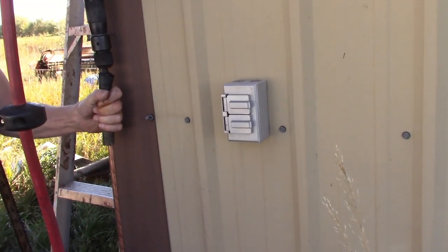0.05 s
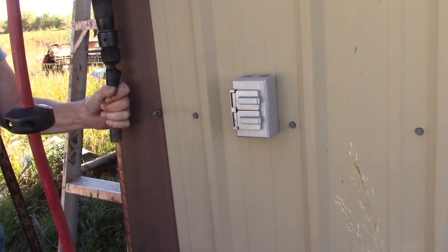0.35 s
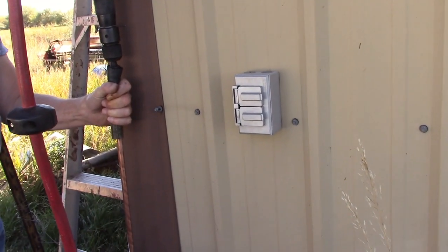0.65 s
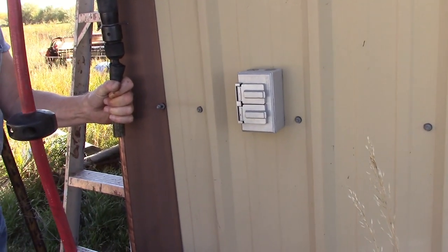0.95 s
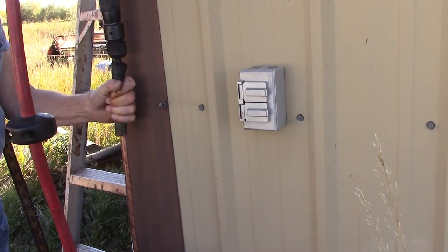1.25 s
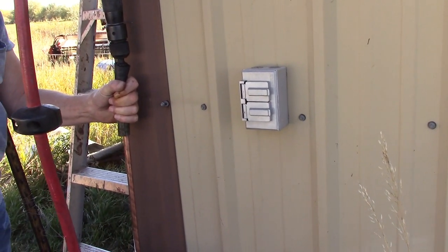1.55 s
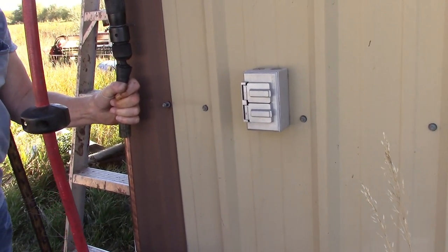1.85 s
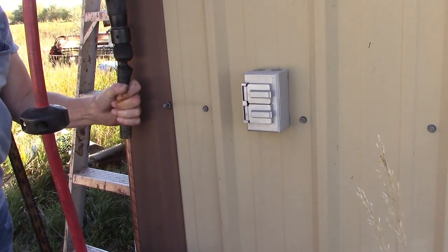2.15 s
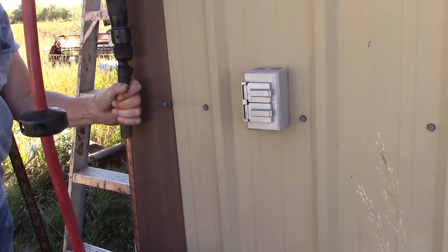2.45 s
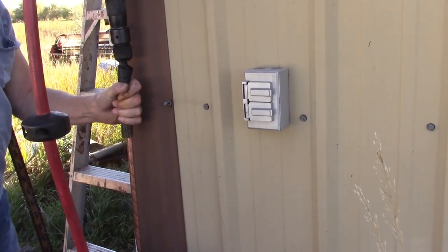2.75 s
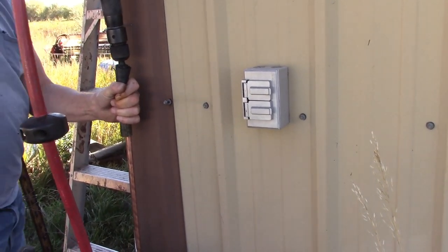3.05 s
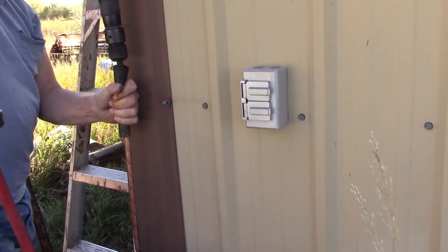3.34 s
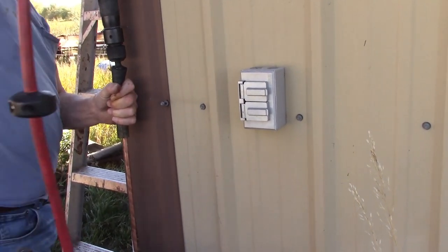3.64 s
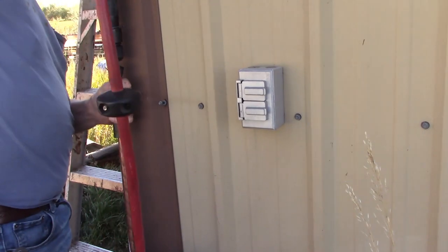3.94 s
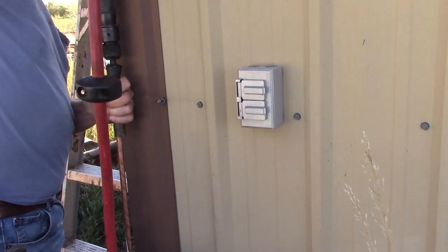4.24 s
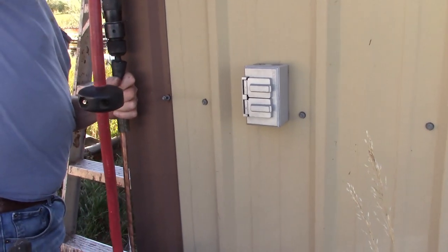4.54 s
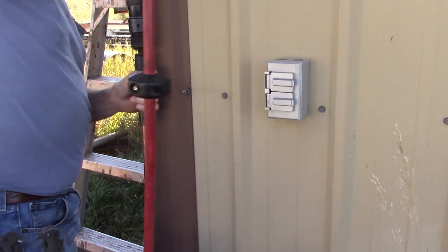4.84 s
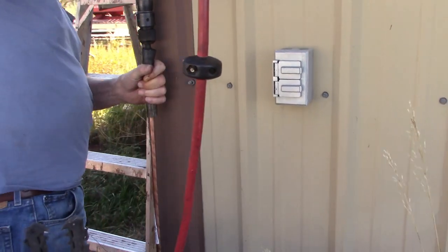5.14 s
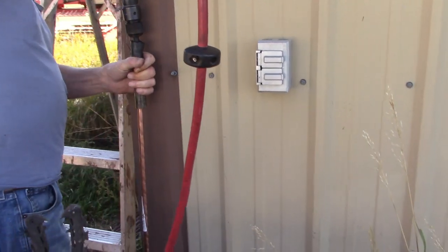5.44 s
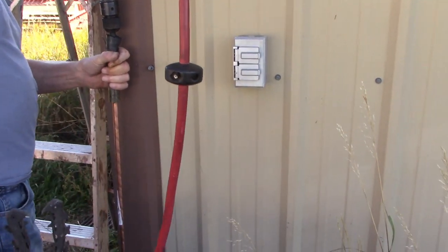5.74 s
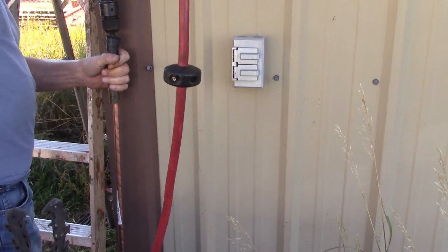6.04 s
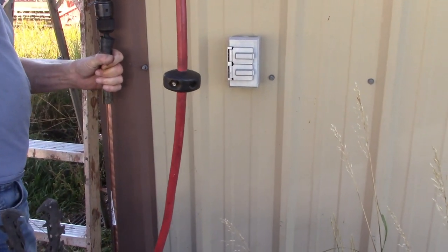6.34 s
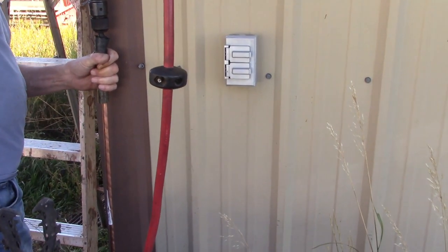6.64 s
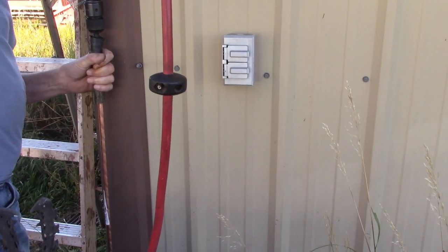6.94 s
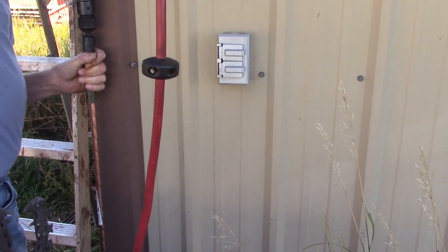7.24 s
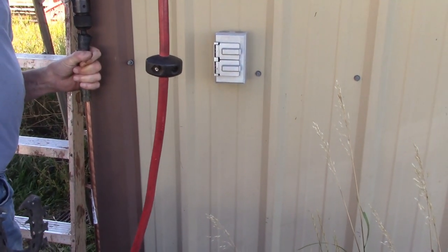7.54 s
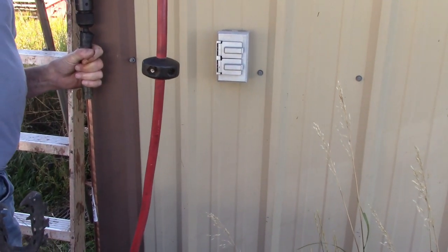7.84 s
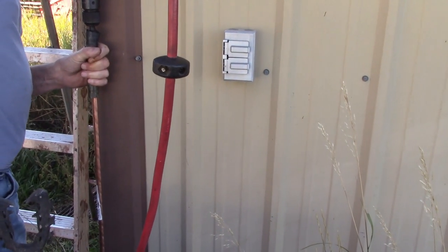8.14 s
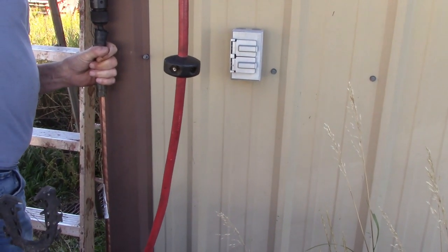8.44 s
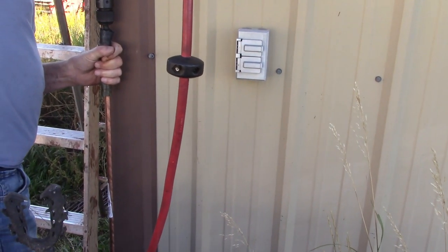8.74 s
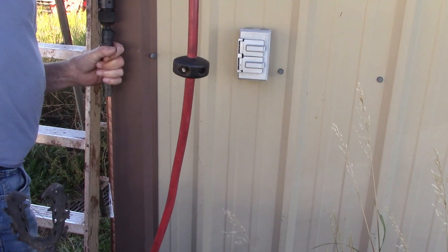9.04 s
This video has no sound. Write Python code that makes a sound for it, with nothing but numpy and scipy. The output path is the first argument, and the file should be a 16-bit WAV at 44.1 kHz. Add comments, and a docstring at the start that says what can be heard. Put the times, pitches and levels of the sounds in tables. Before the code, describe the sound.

A hand-held air hammer drives a steel rod into the ground beside a sheet-metal shed. Its loud, fast chatter mixes sharp metallic blows, spitting exhaust air and the ringing of the rod. After about three seconds it stops briefly, with a few clacks and a short hiss of air, then stutters back into steady hammering. The sound is close, with light outdoor reflections.

```python
"""A rapid metallic hammering, about 32 strokes a second, fills a quiet yard: a hand-held air hammer
drives a steel ground rod beside a sheet-metal shed. Each stroke is an exhaust puff that drums the shed
wall, then a piston impact that excites the normal modes of bit and rod; wall and ground reflect it.
After three seconds the tool rests briefly and clacks, air hisses through the half-pressed trigger,
and the piston stutters back to life."""
import sys
import numpy as np
from scipy import signal
from scipy.fft import rfft, irfft, next_fast_len
from scipy.io import wavfile
from scipy.ndimage import uniform_filter1d

SR = 44100
rng = np.random.default_rng(int(sys.argv[2]) if len(sys.argv) > 2 else 0)


def generate_wav(sig):
    """Save sig (samples, or channels by samples) to the path in sys.argv[1] as 16-bit PCM at SR."""
    pcm = np.round(np.clip(np.atleast_2d(sig).T, -1, 1) * 32767).astype(np.int16)
    wavfile.write(sys.argv[1], SR, pcm)


N = 405279


def amp(db):
    """Amplitude ratio of a level in decibels."""
    return 10 ** (np.asarray(db) / 20)


def unit(x):
    """Normalisation to rms 1."""
    return x / np.sqrt(np.mean(x ** 2) + 1e-20)


def along(points, hz):
    """Interpolation of (frequency, value) points on a logarithmic axis."""
    f, values = np.transpose(points)
    return np.interp(np.log(hz + 1), np.log(f + 1), values)


def curve(points, times):
    """Linear interpolation of (time, value) points."""
    return np.interp(times, *np.transpose(points))


def filtered(x, response):
    """Linear filtering: the spectrum of x times a frequency response."""
    size = next_fast_len(N + SR // 2)
    return irfft(rfft(x, size) * response(np.fft.rfftfreq(size, 1 / SR)), size)[:N]


def tinted(x, spectrum):
    """Spectral shaping that conserves the power of a white input."""
    return filtered(x, lambda hz: unit(amp(along(spectrum, hz))))


def noise(spectrum):
    """Coloured Gaussian noise of rms about 1."""
    return tinted(rng.standard_normal(N), spectrum)


def impulse(spectrum, size=4096):
    """The minimum-phase pulse of a spectrum, from its folded cepstrum."""
    cepstrum = irfft(along(spectrum, np.fft.rfftfreq(size, 1 / SR)) * np.log(10) / 20)
    cepstrum[1:size // 2] *= 2
    cepstrum[size // 2 + 1:] = 0
    return irfft(np.exp(rfft(cepstrum)))[:size // 2]


def decay(attack, t60, size=3000):
    """Exponential damping after a quick rise; both times are in seconds."""
    t = np.arange(size) / SR
    return (1 - np.exp(-t / attack)) * amp(-60 * t / t60)


def scatter(times, spread):
    """One Gaussian deviation per stroke."""
    return spread * rng.standard_normal(len(times))


def train(times, db, shapes):
    """Superposition of one shape per stroke, scaled so that a steady run has the rms level db."""
    shapes = np.broadcast_to(shapes, (len(times), shapes.shape[-1]))
    energy = np.mean(np.sum(shapes ** 2, axis=1))
    scale = np.sqrt(np.median(np.diff(times)) * SR / energy)
    index = np.round(np.abs(times) * SR).astype(int)[:, None] + np.arange(shapes.shape[1])
    return np.bincount(index.ravel(), (scale * amp(db)[:, None] * shapes).ravel(), N)[:N]


def ringing(times, db, modes, loose, detune, vary_db=2.5, ratio=1, attack=0.0004):
    """Damped normal modes, struck at varying strength; loose contact scatters phase [rad] and pitch."""
    shapes = 0
    for hz, mode_db, t60 in modes:
        envelope = decay(attack, t60)
        t = np.arange(len(envelope)) / SR
        strength, phase, pitch = rng.standard_normal((len(times), 3)).T[:, :, None]
        tone = np.sin(2 * np.pi * hz * (ratio + detune * pitch) * t + loose * phase)
        shapes = shapes + amp(mode_db + vary_db * strength) * envelope * tone
    return train(times, db, shapes)


# Outdoor background: (frequency [Hz], relative spectral level [dB])
BACKGROUND_SPECTRUM = [(25, -40), (60, -27), (120, -12.5), (280, -11.5), (600, -21), (1500, -22.5),
                       (3800, -35), (7000, -36), (16000, -49)]
def background():
    """Stationary low noise, masked while the hammer runs."""
    return amp(-42.5) * noise(BACKGROUND_SPECTRUM)


RUN_STARTS_S = (.0079, 3.6894)
# Piston rate in the first and the second run: (time [s], rate [strokes/s])
FIRST_RATE = [(0.01, 32.83), (0.62, 33.13), (1.27, 32.7), (2.63, 33.13), (2.7, 32.3), (3.04, 31.6)]
SECOND_RATE = [(3.69, 34.45), (4.15, 30.96), (4.59, 31.29), (5.5, 29.14), (5.68, 29.94), (5.73, 32.68),
               (7.72, 32.61), (9.19, 32.97)]
def strokes(jitter_s=.00003, drift_s=.0003):
    """Phase is the integral of rate: the piston fires once a cycle, with slightly wandering timing."""
    times = []
    for start, rate in zip(RUN_STARTS_S, (FIRST_RATE, SECOND_RATE)):
        t = np.arange(start * SR, rate[-1][0] * SR) / SR
        cycles = np.cumsum(curve(rate, t)) / SR
        times.extend(np.interp(np.arange(cycles[-1]), cycles, t))
    return np.array(times) + scatter(times, jitter_s) + uniform_filter1d(scatter(times, drift_s), size=9)


def load(times, free_hz=32.8, loaded_hz=29.2):
    """Mechanical loading slows the piston, so its rate gives the weight on the tool, 0 to 1."""
    rate = curve(FIRST_RATE + SECOND_RATE, times)
    return np.clip((free_hz - rate) / (free_hz - loaded_hz), 0, 1)


# The puff, coloured by the tool and its corner: (frequency [Hz], relative spectral level [dB])
PUFF_SPECTRUM = [(60, -35.5), (120, -21.5), (155, -3.5), (195, -4), (235, -16), (275, -2.5), (355, -0.5),
                 (395, -15.5), (440, -2.5), (560, -0.5), (650, 2.5), (730, -5), (900, -18.5), (4000, -37.5)]
def exhaust_puff(times, db):
    """Sudden outflow: the opening port radiates a low pressure pulse of the same shape each time."""
    return train(times + 0.00072, db + 0.26 + scatter(times, 0.46), impulse(PUFF_SPECTRUM))


# Air jet at the exhaust port: (frequency [Hz], relative spectral level [dB])
JET_SPECTRUM = [(100, -32), (600, 8), (1000, -0.5), (2000, 1), (5000, 6), (9000, 4), (12500, 4),
                (14000, -1), (16000, -18)]
def exhaust_jet(times, db):
    """Turbulence: each release of air makes a short spit of broadband noise."""
    envelope = train(times + 0.00033, db + scatter(times, 0.97), decay(attack=0.00048, t60=0.015))
    return envelope * noise(JET_SPECTRUM)


# Modes of the sheet-metal wall: (frequency [Hz], relative level [dB], T60 [s])
PANEL_MODES = [(164.2, 5.5, 0.11), (264.1, 14, 0.09)]
def shed_panel(times, puff_db, coupling_db=-16, load_db=4.5):
    """Forced plate vibration: the puffs drum the wall, more loudly as the rod bears on it."""
    db = puff_db + coupling_db + load_db * load(times)
    return ringing(times, db, PANEL_MODES, loose=0.03, detune=0.001, vary_db=0.5, attack=0.0064)


# Snap of the piston on the bit: (frequency [Hz], relative spectral level [dB])
SNAP_SPECTRUM = [(3000, -45), (6500, 1), (8000, 1.5), (11000, 3), (12800, -4.5), (14000, -15), (16000, -18)]
def impact_snap(times, db):
    """Brief steel-on-steel contact gives a transient rich in high frequencies."""
    envelope = train(times, db + scatter(times, 1.04), decay(attack=0.000063, t60=0.028))
    return envelope * noise(SNAP_SPECTRUM)


# Clatter of the blow: (frequency [Hz], relative spectral level [dB])
CLATTER_SPECTRUM = [(30, -45), (100, -7), (250, -6.5), (600, 5.5), (1000, -2.5), (1600, 0), (2500, 0.5),
                    (3300, 1.5), (4400, -1.5), (6500, -1.5), (9000, -8.5), (16000, -33)]
def clatter(times, db, coherence=0.86, corner_hz=2600, rattle_s=0.0106, rattle_db=-12):
    """Modal overlap: dense steel modes merge into noise; only the low ones ring alike at each blow."""
    db = db + 1.23 + scatter(times, 1.0)
    envelope = decay(attack=0.00032, t60=0.041)
    rattle = np.pad(decay(attack=0.0003, t60=0.012), (round(rattle_s * SR), 0))  # the bit strikes again
    envelope += amp(rattle_db) * rattle[:len(envelope)]
    fresh, drifting = rng.standard_normal((2, len(times), len(envelope)))
    drifting = uniform_filter1d(drifting, size=25, axis=0)  # shared by neighbouring blows
    share = lambda hz: coherence / (1 + (hz / corner_hz) ** 2)
    steady = filtered(train(times, db, drifting * envelope), lambda hz: np.sqrt(share(hz)))
    changing = filtered(train(times, db, fresh * envelope), lambda hz: np.sqrt(1 - share(hz)))
    return tinted(steady + changing, CLATTER_SPECTRUM)


# Bending modes of the loaded rod: (nominal frequency [Hz], relative level [dB], T60 [s])
BENDING_MODES = [(193, -2, 0.062), (338.6, -1, 0.12), (848, -9.5, 0.18), (1158, -3, 0.13),
                 (1420, -0.5, 0.069), (1654, 3.5, 0.056), (2693, 4.5, 0.037)]
def rod_hum(times, seated_db=-27.5, free_drop_db=-24, seating_load=0.093):
    """Flexural vibration: the rod hums once pressed home, and its pitch sinks under compression."""
    weight = load(times)
    db = seated_db + free_drop_db * np.exp(-weight / seating_load)
    ratio = 1.1 - 0.153 * weight[:, None]
    return ringing(times, db, BENDING_MODES, loose=0.58, detune=0.0017, vary_db=1.0, ratio=ratio)


# Ringing modes of the rod: (frequency [Hz], relative level [dB], T60 [s])
ROD_MODES = [(1282, 2.5, 0.053), (1229.4, -8.5, 0.13), (1371, -7, 0.092), (1700, -7, 0.11),
             (822, -5, 0.075), (883, -7, 0.047)]
# Strength of that ring: (time [s], relative level [dB])
ROD_RING_LEVEL = [(0.01, -24), (1.4, -22.5), (2.9, -25.5), (3.03, -32), (3.69, -27.5), (5.6, -31),
                  (5.9, -40), (7.2, -26.5), (9.15, -31.5)]
def rod_ring(times, gain_db=-0.5):
    """Free vibration: after each blow the long rod rings at its low natural frequencies."""
    return ringing(times, curve(ROD_RING_LEVEL, times) + gain_db, ROD_MODES, loose=0.56, detune=0.0024)


# Lower and upper modes of the bit: (frequency [Hz], relative level [dB], T60 [s])
BIT_LOW_MODES = [(5150, 4.5, 0.018), (3864, -9, 0.03), (3254, -10, 0.026), (6210, -16, 0.087)]
BIT_HIGH_MODES = [(8426, 8.5, 0.014), (7240, -6, 0.023), (10530, -3, 0.01)]
# Swell and fade of the upper modes: (time [s], relative level [dB])
BIT_HIGH_LEVEL = [(0.01, -21.5), (0.2, -26), (0.9, -19.5), (1.1, -26), (1.5, -34), (2.0, -17.5),
                  (3.03, -33.5), (3.69, -21), (5.0, -18.5), (5.2, -34), (5.8, -26.5), (6.2, -17),
                  (7.8, -28), (8.1, -19), (8.5, -23.5), (9.15, -20.5)]
def bit_ring(times, tight_db=-33, loose_db=-24.5, wander_db=3.0, high_gain_db=-1):
    """A short bar has high natural frequencies; the bit's lower modes swell and fade at random."""
    low_db = np.where(times < RUN_STARTS_S[1], tight_db, loose_db)  # it sits looser in the second run
    low_db += uniform_filter1d(scatter(times, wander_db), size=7)
    high_db = curve(BIT_HIGH_LEVEL, times) + high_gain_db
    low = ringing(times, low_db, BIT_LOW_MODES, loose=0.82, detune=0.0089, vary_db=1.8, attack=0.001)
    high = ringing(times, high_db, BIT_HIGH_MODES, loose=1.45, detune=0.011, vary_db=2.7, attack=0.0017)
    return low + high


# Modes of the rod's clang: (nominal frequency [Hz], relative level [dB], T60 [s])
CLANG_MODES = [(2034, 6, 0.015), (1908, 0, 0.015)]
# Spells of hard contact: (centre time [s], half length [s], level [dB])
HARD_CONTACTS = [(3.03, 0.025, -21), (4.3, 0.22, -26.5), (5.24, .13, -23.5), (5.606, .1, -23)]
def rod_clang(times, round_trip_s=.0048, floor_db=-34):
    """Wave reflection: each blow returns up the rod as a short clang, rising in pitch with weight."""
    swells = sum(amp(db) * np.exp(-((times - centre) / half) ** 2) for centre, half, db in HARD_CONTACTS)
    clang_db = 20 * np.log10(amp(floor_db) + swells)
    ratio = 0.96 + 0.028 * load(times)[:, None]
    return ringing(times + round_trip_s, clang_db, CLANG_MODES,
                   loose=1.43, detune=0.021, vary_db=2.2, ratio=ratio, attack=0.003)


# Strength of the clatter through both runs: (time [s], relative level [dB])
BLOW_LEVEL = [(0.01, -24.5), (1.4, -18), (2.0, -20.5), (3.03, -18), (3.69, -21), (5.3, -25), (5.9, -20),
              (6.1, -23.0), (7.8, -21), (9.15, -23.5)]
# Half strokes as the piston stumbles or restarts, in relative levels:
# (time [s], puff [dB], clatter [dB], jet and snap [dB])
HALF_STROKES = [(0.873, -30, -31, -42), (1.084, -21, -33, -48), (1.236, -28, -21, -39),
                (2.816, -29.5, -25, -40), (3.662, -21.5, -40, -20), (3.6694, -24, -16.5, -24),
                (4.943, -33, -36, -47.5)]
def hammer(travel_s=.0028):
    """Periodic excitation: exhaust, then impact after the piston's travel. Returns (low, bright)."""
    full = strokes()
    weight = load(full)
    full_strokes = [full,
                    -19 - weight,  # weight chokes the puff
                    curve(BLOW_LEVEL, full) - 1.5,
                    -20.5 + 4 * weight ** 4]  # heavy weight hardens jet and snap
    times, puff_db, clatter_db, bright_db = np.hstack([full_strokes, np.transpose(HALF_STROKES)])
    bright_db -= 3.5
    hits = times + travel_s + scatter(times, .00005)
    full_hits = hits[:len(full)]  # only full blows ring the rod and bit
    low = exhaust_puff(times, puff_db) + shed_panel(times, puff_db)
    jet = exhaust_jet(times, bright_db)
    blows = impact_snap(hits, bright_db) + clatter(hits, clatter_db)
    steel = rod_hum(full_hits) + rod_ring(full_hits) + rod_clang(full_hits) + bit_ring(full_hits)
    return low, jet + blows + steel


# Paths by way of wall and ground: (delay [s], amplitude ratio [1])
ECHO_PATHS = [(.0068, 0.073), (.0103, 0.13), (0.0144, 0.13), (0.0123, 0.18)]
def echoes(x):
    """Early reflections: wall and ground return delayed, weaker copies."""
    return filtered(x, lambda hz: sum(gain * np.exp(-2j * np.pi * hz * lag) for lag, gain in ECHO_PATHS))


# Decay of the yard and the shed's panels: (frequency [Hz], T60 [s])
YARD_DECAY = [(150, 1), (600, 0.75), (2000, 0.89), (6000, 0.52), (14000, 0.24)]
def yard_reverb(x, build_s=0.0019):
    """Reverberation: a diffuse outdoor tail in which each frequency dies at its own rate."""
    hz, t, spectrogram = signal.stft(rng.standard_normal(SR), SR, nperseg=256)
    damping = amp(-60 * t / along(YARD_DECAY, hz)[:, None])
    _, tail = signal.istft(spectrogram * damping, SR)
    tail *= 1 - np.exp(-np.arange(len(tail)) / SR / build_s)
    return signal.fftconvolve(x, tail / np.linalg.norm(tail))[:N]


# Clacks and bumps of the resting tool: (time [s], level [dB], centre [Hz], width [octaves], T60 [s])
TOOL_KNOCKS = [(3.096, -21.5, 216, 0.3, 0.12), (3.1959, -15, 3981, 0.81, 0.028),
               (3.194, -28, 160, 0.48, 0.064), (3.461, -29.5, 787, 0.59, 0.063),
               (3.469, -24, 340, 0.58, 0.1), (3.675, -34, 55, 0.72, .1)]
def knocks():
    """Heavily damped impacts: shifting the tool on the rod makes short bursts of band-limited noise."""
    out, t = np.zeros(N), np.arange(N) / SR
    for start, db, centre, octaves, t60 in TOOL_KNOCKS:
        passband = lambda hz: np.exp(-.5 * (np.log2((hz + 1) / centre) / octaves) ** 2)
        band = unit(filtered(rng.standard_normal(N), passband))
        out += band * (t >= start) * amp(db - 60 * np.abs(t - start) / t60)
    return out


# Strength of the leak at the trigger valve: (time [s], level [dB])
LEAK_LEVEL = [(3.3, -90), (3.4, -47), (3.48, -40.5), (3.515, -28.5), (3.59, -31.5), (3.63, -40),
              (3.66, -35), (3.68, -75)]
# Its hiss: (frequency [Hz], relative spectral level [dB])
LEAK_SPECTRUM = [(400, -22.5), (900, -10.5), (2700, -10.5), (4000, -14), (6200, -2.5), (7500, -8),
                 (10000, -12.5), (16000, -18)]
def trigger_leak():
    """Turbulent flow through a constriction: the half-open valve hisses before the piston restarts."""
    return amp(curve(LEAK_LEVEL, np.arange(N) / SR)) * noise(LEAK_SPECTRUM)


def scene():
    """Superposition of the direct sound, echoes of its bright part, reverberation and background."""
    low, bright = hammer()
    tool = low + bright + knocks() + trigger_leak()
    return (tool + echoes(bright) + amp(-19.5) * yard_reverb(tool) + background())[None]


def record(dry, hardness=5, top_hz=15850):
    """Soft saturation rounds the highest peaks; a low-pass filter limits the bandwidth."""
    rounded = dry[0] / (1 + np.abs(dry[0]) ** hardness) ** (1 / hardness)
    return filtered(rounded, lambda hz: hz < top_hz)[None]


dry = scene()
out = record(dry)
generate_wav(out)
```